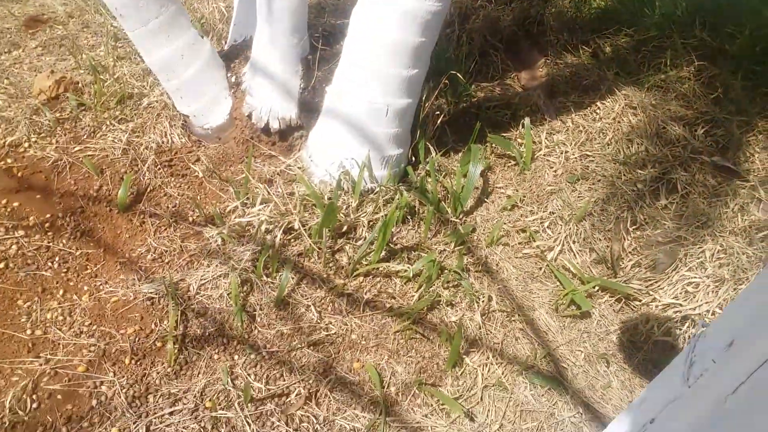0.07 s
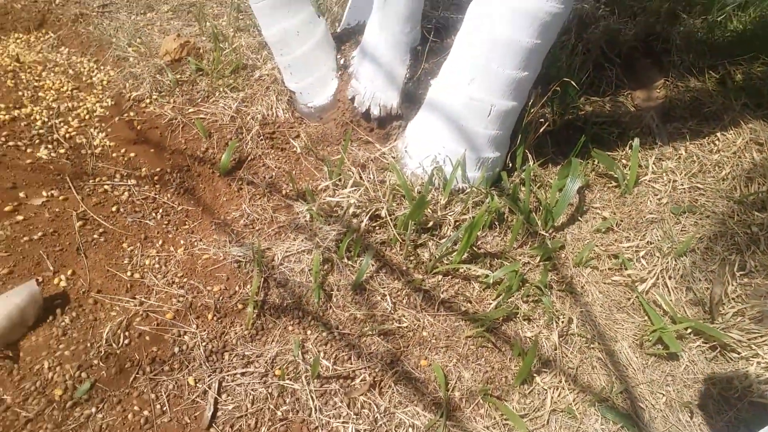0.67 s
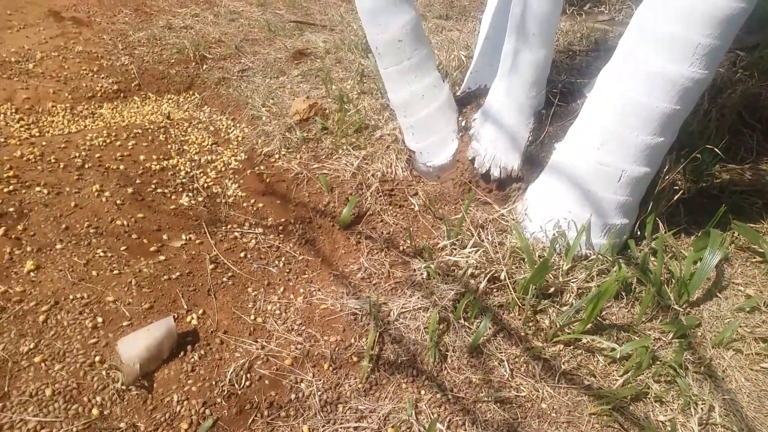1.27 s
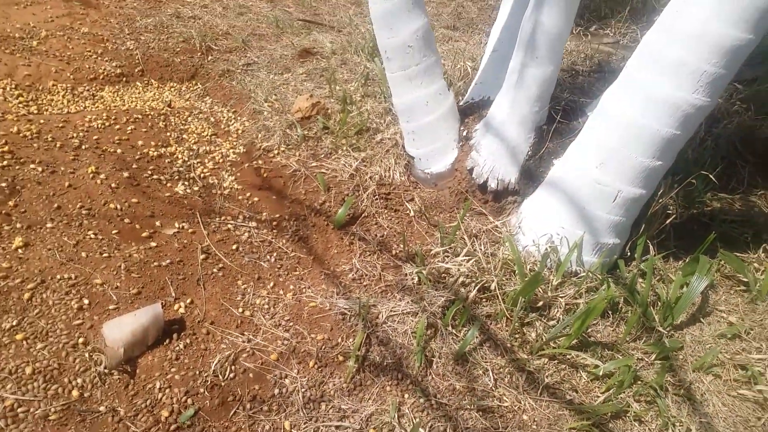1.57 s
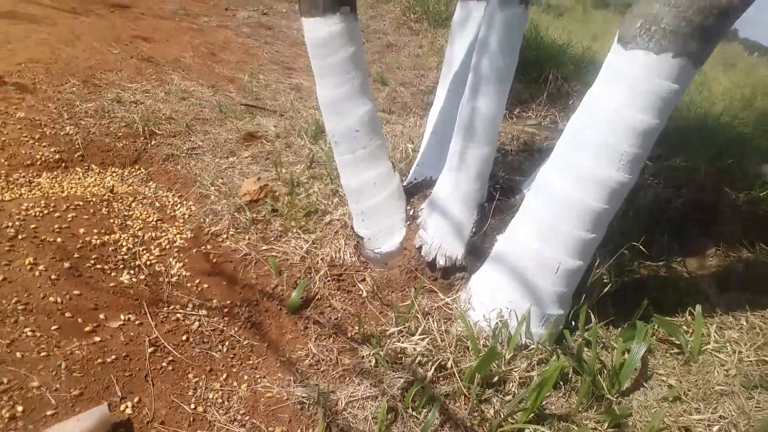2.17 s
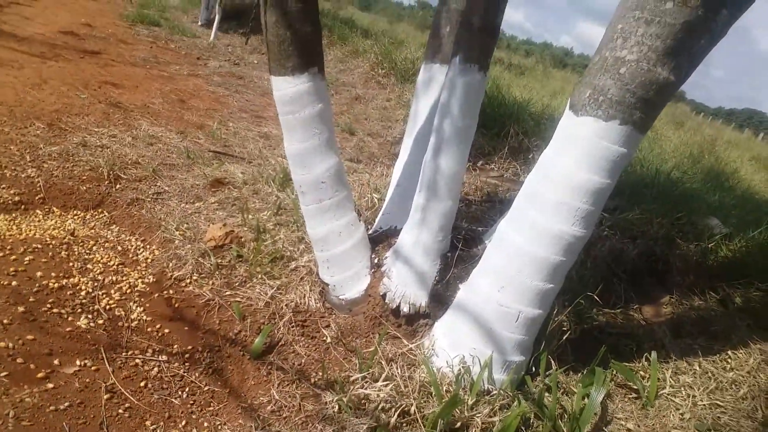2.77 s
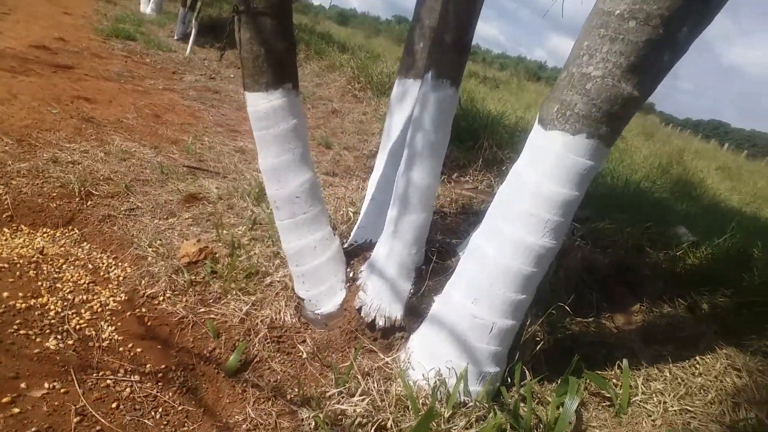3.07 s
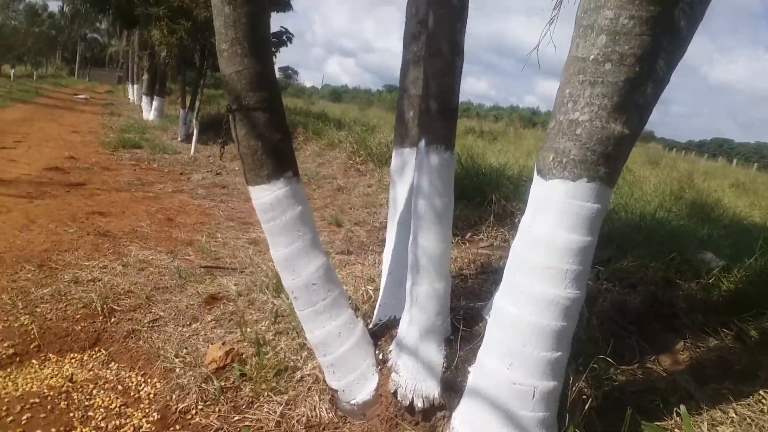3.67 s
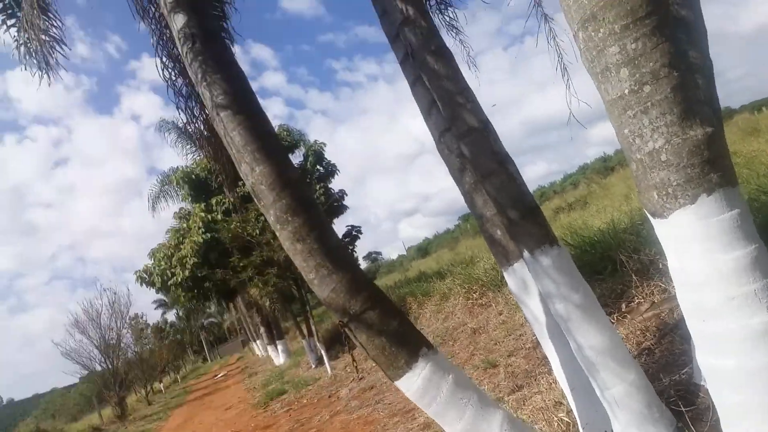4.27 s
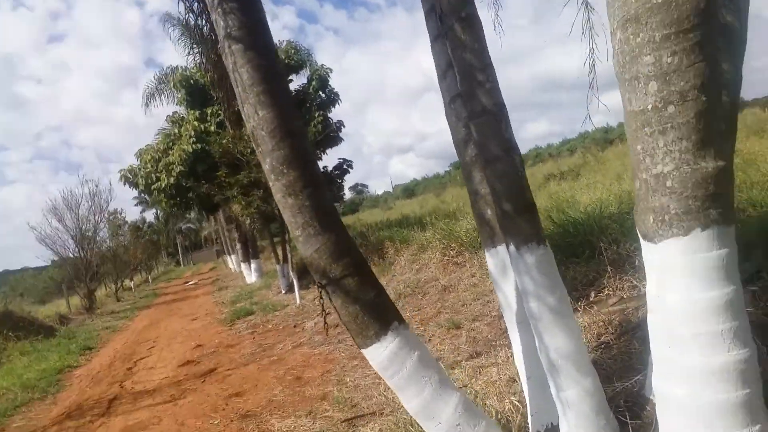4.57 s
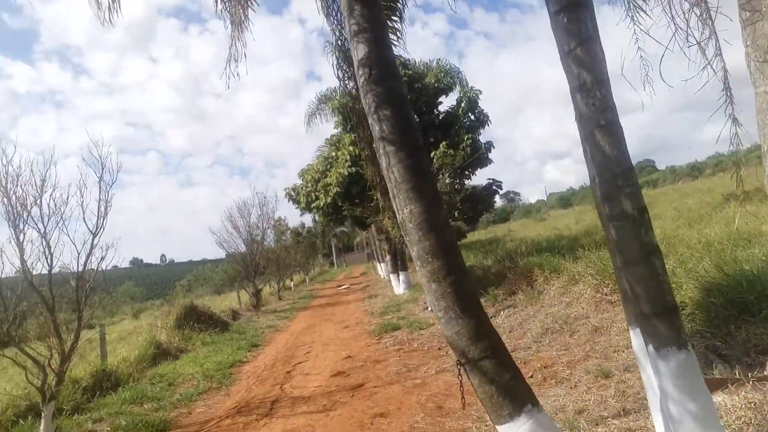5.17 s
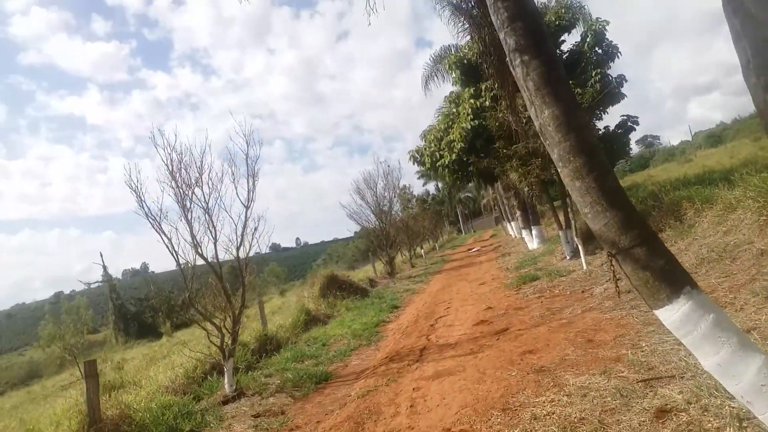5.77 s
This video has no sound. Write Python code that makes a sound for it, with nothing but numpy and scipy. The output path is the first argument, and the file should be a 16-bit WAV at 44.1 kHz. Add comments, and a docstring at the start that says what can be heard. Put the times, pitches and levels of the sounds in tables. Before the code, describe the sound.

On a quiet farm, someone shifts on dry grass with soft sleeve swishes, small snaps of straw and light puffs of wind. Fingers then bump, rub and tick right against the left side of a hand-held microphone. Something hard and hollow knocks three times with a brief ring, while stronger gusts rumble unevenly on both sides. A distant bird gives one very faint chirp near the end.

```python
"""Someone shifts about on dry grass on a quiet farm, turning a hand-held recorder.
From the start a sleeve swishes and straw snaps underfoot, over faint air and a few light puffs of wind.
From 1.9 to 3.8 s fingers bump, rub and tick beside the left microphone port.
At 4.0, 4.6 and 5.1 s something hard and hollow knocks and rings.
From 4.6 s stronger gusts buffet both ports; at 5.5 s a far bird chirps once."""
import sys
import numpy as np
from scipy import signal
from scipy.fft import rfft, irfft, next_fast_len
from scipy.io import wavfile
from scipy.ndimage import uniform_filter1d

SR = 44100
rng = np.random.default_rng(int(sys.argv[2]) if len(sys.argv) > 2 else 0)


def digitize_waveform(pressure):
    """Quantize a signal to 16-bit integers and store it at the path in sys.argv[1].

    Rows of a 2-D input are taken as channels; values are limited to [-1, 1].
    """
    field = np.atleast_2d(pressure).T
    bounded = np.clip(field, -1, 1)
    quanta = np.round(bounded * 32767).astype(np.int16)
    wavfile.write(sys.argv[1], SR, quanta)


N = 264996
TIME = np.arange(N) / SR
# skin scraping on the casing: (frequency [Hz], relative density [dB])
SKIN_SPECTRUM = [(70, -13), (200, -5.5), (340, -1), (550, -1), (900, -10.5), (1800, -12.5), (3300, -27),
                 (4500, -30.5), (8000, -35.5), (15000, -47)]


def from_db(db):
    """Decibels to gain."""
    return 10 ** (np.asarray(db) / 20)


def rms_one(x):
    """Scale to rms 1."""
    return x / np.sqrt(np.mean(x ** 2) + 1e-20)


def pan(db):
    """Stereo gains for a left-minus-right level."""
    return from_db([[db / 2], [-db / 2]])


def since(start_s):
    """Seconds since the start; zero before it."""
    return np.maximum(TIME - start_s, 0)


def swell(start_s, length_s, edge_s):
    """Gate with soft edges."""
    opening = np.clip((TIME - start_s) / edge_s + .5, 0, 1)
    return opening * np.clip((start_s + length_s - TIME) / edge_s + .5, 0, 1)


def dying(start_s, t60_s, rise_s=0.00045):
    """Linear rise, exponential fall."""
    age_s = since(start_s)
    return np.minimum(age_s / rise_s, 1) * from_db(-60 * np.minimum(age_s / t60_s, 3))


def drift(rate_hz):
    """Smooth random wander, rms 1."""
    hop, settle = 40, 2000
    pole = np.exp(-2 * np.pi * rate_hz * hop / SR)
    white = rng.standard_normal(N // hop + settle + 2)
    slow = signal.lfilter([1], [1, -2 * pole, pole * pole], white)[settle:]
    return np.interp(np.arange(N) / hop, np.arange(len(slow)), rms_one(slow))


def colour(x, spectrum):
    """Filter by a spectrum, rolling off past its ends; rms 1."""
    hz, db = np.transpose(spectrum)
    size = next_fast_len(N)
    bin_hz = np.arange(size // 2 + 1) * SR / size + 1
    gain = from_db(np.interp(np.log(bin_hz), np.log(hz), db))
    gain *= np.minimum(bin_hz / hz[0], 1) ** 2 * np.minimum(hz[-1] / bin_hz, 1) ** 2
    return rms_one(irfft(rfft(x, size) * gain, size)[..., :N])


def noise(spectrum, shared=0):
    """Stereo noise; shared is the power fraction common to both sides."""
    white = rng.standard_normal((3, N))
    return colour(np.sqrt(1 - shared) * white[:2] + np.sqrt(shared) * white[2], spectrum)


def grains(per_s, spread_db):
    """Random clicks of uneven size."""
    sizes = from_db(spread_db * np.minimum(rng.exponential(1, N), 4)) * rng.choice([-1, 1], N)
    return sizes * (rng.random(N) < per_s / SR)


def finger_bumps(gain_db=5, delay_s=0.002996, scuff_db=-22, scuff_t60_s=0.069):
    """A fingertip scuffs as it lands and pushes a pressure pulse into the port, which leaks away."""
    # (time [s], relative level [dB], nominal pitch [Hz])
    bumps = [(1.946, -23, 142), (1.981, -23.5, 249), (1.994, -21.5, 200), (2.038, -20.5, 154),
             (2.079, -17, 292), (2.174, -9.5, 307), (2.312, -25.5, 255), (2.377, -19.5, 406),
             (2.809, -30, 363.5), (2.881, -23.5, 245), (3.038, -43.5, 236), (3.186, -29.5, 307),
             (3.292, -25, 364), (3.367, -37.5, 179), (3.457, -32, 340), (3.522, -33, 258),
             (3.558, -36.5, 670), (3.649, -29.5, 254)]
    thuds, impulse = np.zeros(N), signal.unit_impulse(SR // 10)
    for s, db, hz in bumps:
        push = signal.sosfilt(signal.butter(2, 0.62 * hz, fs=SR, output="sos"), impulse)
        leak = signal.butter(4, 0.81 * hz, "high", fs=SR, output="sos")
        pulse = signal.sosfilt(leak, push)
        at = int((s + delay_s) * SR)
        thuds[at:at + len(pulse)] -= from_db(db + gain_db) * pulse / np.abs(pulse).max()
    scuff = sum(from_db(db + scuff_db) * dying(s + delay_s, scuff_t60_s) for s, db, _ in bumps)
    return thuds + scuff * noise(SKIN_SPECTRUM)[0]


def finger_rubbing(edge_s=0.019, judder_db=4.0, slide_rumble_db=-48):
    """Skin sticks and slips on the casing: coarse slips scrape, fine ones hiss, the finger rumbles."""
    # finger slides: (start [s], length [s], scrape [dB], hiss re scrape [dB])
    strokes = [(1.877, 0.18, -40.5, -9), (1.986, 0.044, -40, 4.5), (2.081, .012, -34, -6.5),
               (2.1, 0.068, -44, -10), (2.182, .1, -30, -0.5), (2.314, 0.041, -35, -8),
               (2.375, 0.1, -32.5, -11), (2.477, 0.12, -39, -11), (2.662, 0.086, -45.5, -1.5),
               (2.943, 0.065, -47, -2), (3.182, 0.097, -47, -11.5), (3.293, 0.037, -48, -3),
               (3.341, 0.071, -44.5, -16.5), (3.456, 0.044, -42, -21), (3.521, 0.12, -42, -28),
               (3.691, .15, -45.5, -32)]
    # finger leans on the casing: (start [s], length [s], rumble [dB])
    presses = [(1.982, 0.045, -25.5), (2.042, 0.034, -26.5), (2.583, 0.063, -47), (2.882, .05, -37.5),
               (3.23, 0.046, -40)]
    # fine slips, casing rumble: (frequency [Hz], relative density [dB])
    hiss_spectrum = [(300, -24), (1200, 1), (2600, -1.5), (4500, -1.5), (7000, -10), (10000, -19),
                     (15000, -25)]
    rumble_spectrum = [(35, -53), (60, 3.5), (95, -0.5), (140, -4), (220, -4), (350, -13.5), (700, -22.5),
                       (2000, -63)]
    scrape_fade_db_per_s, hiss_fade_db_per_s = 48.5, 10  # the finger eases off
    scrape, hiss = 0, 0
    rumble = sum(from_db(db) * swell(s, length_s, edge_s) for s, length_s, db in presses)
    for s, length_s, db, hiss_db in strokes:
        speed = 1 + 0.17 * (np.sin(np.pi * (TIME - s) / length_s) - 2 / np.pi)
        stroke = swell(s, length_s, edge_s) * speed
        scrape += stroke * from_db(db - scrape_fade_db_per_s * since(s))
        hiss += stroke * from_db(db + hiss_db - hiss_fade_db_per_s * since(s))
        rumble += stroke * from_db(slide_rumble_db)
    coarse = colour(grains(per_s=5600, spread_db=3.0), SKIN_SPECTRUM) * from_db(judder_db * drift(39))
    fine = colour(grains(per_s=20000, spread_db=3.5), hiss_spectrum)
    return scrape * coarse + hiss * fine + rumble * noise(rumble_spectrum)[0]


def gust(start_s, length_s, attack_s=0.011, sag_db_per_s=6, release_db_per_s=257):
    """A gust arrives fast, sags while it blows, then drops away."""
    loss_db = sag_db_per_s * since(start_s) + release_db_per_s * since(start_s + length_s)
    return np.minimum(since(start_s) / attack_s, 1) * from_db(-np.minimum(loss_db, 150))


def wind(eddy_db=-4, strong_gust_db=-22, burst_db=5.5):
    """Each port is buffeted separately; bursts of small eddies outgrow the rumble as a gust rises."""
    # (start [s], length [s], left port [dB], right port [dB])
    gusts = [(0.51, 0.095, -57, -51.5), (.691, 0.11, -49, -68), (0.948, 0.026, -51, -50),
             (1.307, 0.035, -70, -43), (2.928, 0.038, -40.5, -68), (3.244, 0.0089, -27.5, -70),
             (4.577, 0.05, -32.5, -45), (4.672, 0.078, -29.5, -48), (4.759, 0.028, -21.5, -24.5),
             (4.833, 0.1, -30, -18.5), (4.961, .19, -45, -20), (5.175, 0.085, -62, -31),
             (5.277, 0.015, -58, -26), (5.343, 0.079, -51, -39.5), (5.476, 0.16, -30, -44.5),
             (5.645, 0.071, -46, -43.5), (5.741, 0.05, -34.5, -45), (5.816, 0.027, -23, -35),
             (5.867, 0.17, -25.5, -43)]
    # rumble, small eddies: (frequency [Hz], relative density [dB])
    buffet_spectrum = [(25, -30), (42, -18), (62, 6), (85, 3.5), (120, 0.5), (190, -10), (280, -28),
                       (420, -37.5), (1000, -66)]
    eddy_spectrum = [(60, -9), (130, 9), (220, 3), (320, -9), (450, -18.5), (700, -51), (2000, -42)]
    strength = np.sqrt(sum((from_db([[left_db], [right_db]]) * gust(s, length_s)) ** 2
                           for s, length_s, left_db, right_db in gusts))
    bursts = np.array([drift(31), drift(19.4)])
    eddy_gain = from_db(eddy_db + burst_db * bursts) * (strength / from_db(strong_gust_db)) ** 1.5
    flow = noise(buffet_spectrum) + eddy_gain * noise(eddy_spectrum)
    # levelled, so gust strength alone sets the pressure swing
    power = uniform_filter1d(uniform_filter1d(flow ** 2, size=1400), size=1400)
    return strength * flow / np.sqrt(np.abs(power) + 1e-9)


def hollow_knocks(ring_db=-4, ring_rise_s=0.0014, clatter_db=-6, echo_db=-25, glint_db=-8):
    """Each blow has a sharp edge and a high glint, rings the modes and dies into the surroundings."""
    # close pairs are double contacts:
    # (time [s], level [dB], left minus right [dB], edge [dB], ring tilt [dB/octave])
    blows = [(3.997, -26, 2, -23, 0), (4.596, -42.5, -0.5, 4, -7.5), (4.6, -40.5, 6, -32, -5),
             (5.139, -33.5, 9, -32, 3), (5.1415, -35, -7, -4.5, 4.5)]
    # hollow body: (frequency [Hz], relative level [dB], t60 [s])
    modes = [(323, -9.5, 0.12), (437, -11, 0.094), (516, -2.5, 0.09), (598, -2, 0.08), (683, 1.5, 0.1),
             (912, -8, 0.13), (976, 0, 0.11), (1145, 4, 0.043), (1252, -0.5, 0.057), (1470, -2.5, 0.054),
             (1894, -5, 0.053), (2630, -2.5, 0.039), (2874, -15.5, 0.14), (4650, -28, 0.21),
             (9460, -27, 0.14), (9470, -32.5, 0.12)]
    # impact noises: (frequency [Hz], relative density [dB])
    clatter_spectrum = [(100, -20), (330, -4), (620, 5), (800, -3.5), (1200, -4), (2600, -6.5),
                        (3500, -21.5), (4800, -21), (8000, -39), (15000, -48)]
    edge_spectrum = [(800, -10), (2500, -13), (5000, 14.5), (7500, -3), (15000, -6)]
    glint_spectrum = [(4200, -9.5), (5000, 0), (5900, -19), (8600, -16.5), (9350, -16), (10200, -28),
                      (15000, -19)]
    out, age_s = np.zeros((2, N)), TIME[:SR // 2]
    hz, mode_db, t60_s = np.transpose(modes)[:, :, None]
    octaves = np.log2(hz / np.median(hz))
    clatter = noise(clatter_spectrum, shared=0.53)
    edge = noise(edge_spectrum, shared=0.12)
    glint = from_db(glint_db) * noise(glint_spectrum)
    for s, db, side_db, edge_db, tilt_db_per_octave in blows:
        echo = from_db(echo_db) * dying(s, t60_s=0.21)
        blow = clatter * (from_db(clatter_db) * dying(s, t60_s=0.099) + echo)
        bright = edge * dying(s, t60_s=0.025) + glint * dying(s, t60_s=0.13)
        blow += from_db(edge_db) * pan(db=-4.0) * bright
        # each port hears each mode a little differently
        scatter_db = rng.standard_normal((2, len(hz), 1))
        phase = rng.random((2, len(hz), 1))
        strength = from_db(ring_db + mode_db + tilt_db_per_octave * octaves + scatter_db)
        rings = strength * np.sin(2 * np.pi * (hz * age_s + phase)) * from_db(-60 * age_s / t60_s)
        at = int(s * SR)
        blow[:, at:at + len(age_s)] += rings.sum(axis=1) * np.minimum(age_s / ring_rise_s, 1)
        out += from_db(db) * pan(side_db) * blow
    return out


def straw_snaps(gain_db=-8, t60_s=0.033, band_ratio=1.48):
    """Stalks and crumbs of earth snap underfoot, each around its own pitch."""
    # (time [s], relative level [dB], band centre [Hz])
    snaps = [(0.127, -43, 600), (0.223, -40, 550), (0.551, -42.5, 3020), (0.639, -33, 1970),
             (1.075, -39, 1100), (1.388, -38, 1300), (3.349, -32.5, 800), (3.728, -29.5, 640),
             (3.942, -40, 950), (4.069, -34.5, 1400), (4.554, -32.5, 694), (4.976, -34.5, 596),
             (5.302, -41, 900), (5.93, -37, 620)]
    # breaking straw: (frequency [Hz], relative density [dB])
    straw_spectrum = [(100, 11), (500, 14), (2000, -4), (3300, -13), (5000, 0), (8000, -32), (15000, -21)]
    out, straw = np.zeros((2, N)), noise(straw_spectrum, shared=.5)
    for s, db, hz in snaps:
        band = signal.butter(1, [hz / band_ratio, hz * band_ratio], "band", fs=SR, output="sos")
        stalk = rms_one(signal.sosfilt(band, straw))
        out += from_db(db + gain_db) * dying(s, t60_s, rise_s=0.00019) * stalk
    return out * pan(db=5.5)


def arm_speed(start_s, attack_s, hold_s, release_per_attack=2.72):
    """An arm speeds up, keeps its pace and slows to rest."""
    rise = np.minimum(since(start_s) / attack_s, 1)
    fall = np.maximum(1 - since(start_s + attack_s + hold_s) / (release_per_attack * attack_s), 0)
    return rise * fall


def sleeve(rest_db=-63.5, flutter_db=1.0):
    """Cloth slides with each arm movement and never lies quite still."""
    # (start [s], attack [s], hold [s], level [dB])
    moves = [(-.05, 0.042, .04, -59.5), (0.412, 0.096, .08, -57), (0.678, 0.096, 0.49, -50.5),
             (1.393, 0.41, .12, -46.5), (2.893, 0.045, 0.043, -55.5), (3.177, 0.059, 0.17, -62.5),
             (3.445, .1, 0.23, -57), (3.897, 0.069, 0.045, -51), (4.12, 0.081, 0.076, -56.5),
             (4.414, 0.075, 0.095, -53.5), (4.772, 0.055, 0.35, -59), (5.83, 0.11, .05, -58)]
    # sliding cloth: (frequency [Hz], relative density [dB])
    cloth_spectrum = [(60, 8), (130, -0.5), (300, 3.5), (800, 0.5), (1300, -1.5), (2200, -5.5), (3300, -13),
                      (4600, -13), (7000, -26.5), (15000, -42)]
    power = sum((from_db(db) * arm_speed(s, attack_s, hold_s)) ** 2 for s, attack_s, hold_s, db in moves)
    cloth = noise(cloth_spectrum, shared=0.15) * from_db(flutter_db * drift(45))
    return np.sqrt(from_db(rest_db) ** 2 + power) * cloth * pan(db=2.5)


def dry_ticks(t60_s=0.0056, band_hz=(3500, 12500)):
    """Very short, thin clicks."""
    # (time [s], level [dB])
    ticks = [(2.125, -35), (2.42, -30.5), (3.365, -39.5)]
    band = signal.butter(1, band_hz, "band", fs=SR, output="sos")
    hiss = rms_one(signal.sosfilt(band, rng.standard_normal(N)))
    return hiss * sum(from_db(db) * dying(s, t60_s, rise_s=0.00013) for s, db in ticks)


def far_bird(start_s=5.455, t60_s=0.18, start_hz=5230, fall_hz_per_s=8000, level_db=-60):
    """One thin falling whistle with a slight waver."""
    glide_hz = start_hz - fall_hz_per_s * np.minimum(since(start_s), t60_s)
    pitch_hz = glide_hz * (1 + 0.026 * drift(91))
    whistle = np.sin(2 * np.pi * np.cumsum(pitch_hz) / SR)
    return from_db(level_db) * dying(start_s, t60_s, rise_s=.01) * whistle


def air(level_db=-58):
    """Steady, faint outdoor hush."""
    # (frequency [Hz], relative density [dB])
    air_spectrum = [(30, -8), (70, -2.5), (145, 3.5), (280, -7.5), (650, -11.5), (1500, -30), (3400, -24.5),
                    (4700, -22.5), (6500, -28), (15000, -30.5)]
    return from_db(level_db) * noise(air_spectrum, shared=0.078)


def scene():
    """Handling reaches almost only the left port; the rest is heard on both sides."""
    hand = (finger_bumps() + finger_rubbing() + dry_ticks()) * from_db([[0], [-31]])
    return hand + sleeve() + straw_snaps() + hollow_knocks() + wind() + far_bird() + air()


def record(dry):
    """Deep bass rolled off, top cut steeply."""
    low_hz, high_hz = 44, 15900
    dry = signal.sosfilt(signal.butter(2, low_hz, "high", fs=SR, output="sos"), dry)
    return signal.sosfilt(signal.ellip(10, .2, 70, high_hz, fs=SR, output="sos"), dry)


dry = scene()
out = record(dry)
digitize_waveform(out)
```